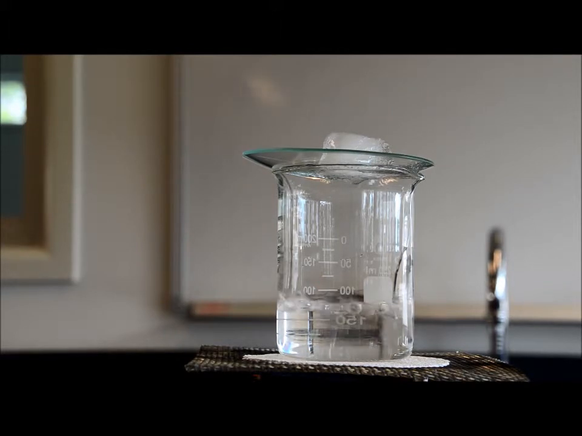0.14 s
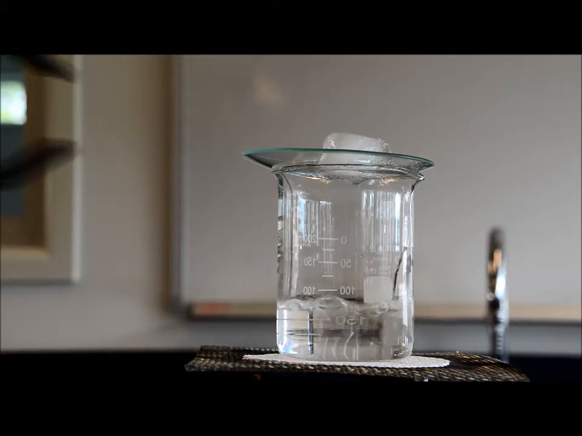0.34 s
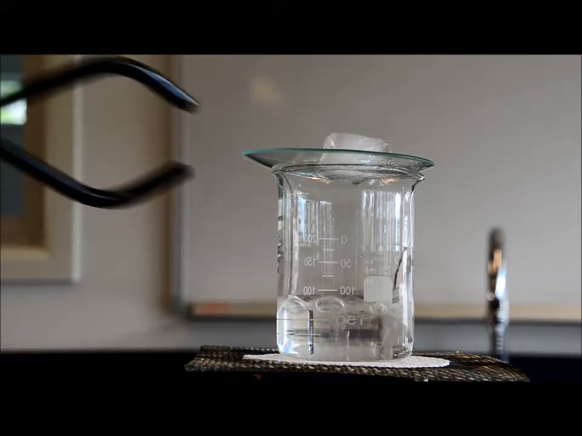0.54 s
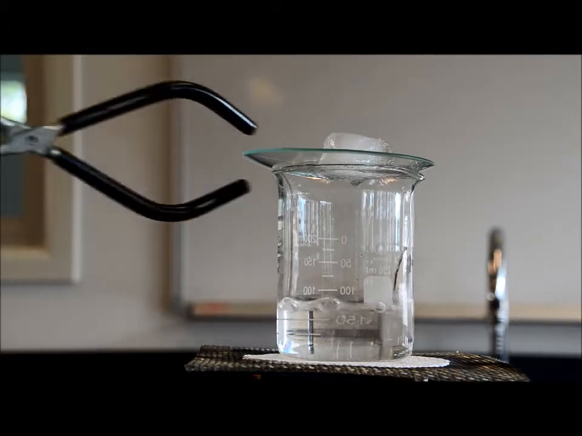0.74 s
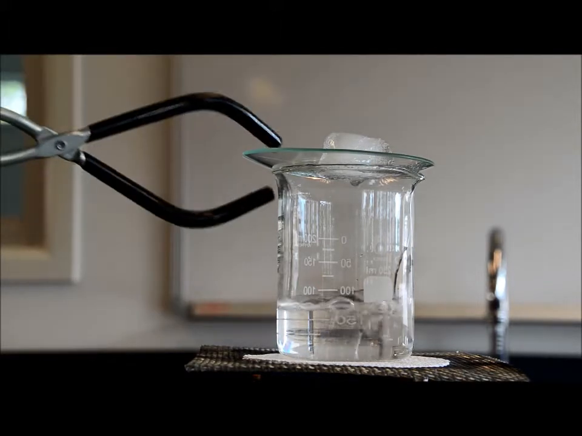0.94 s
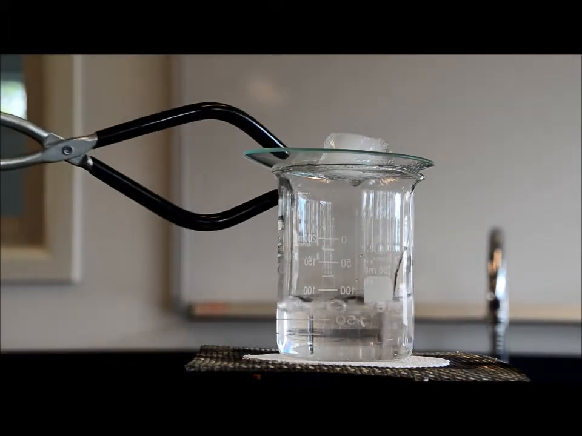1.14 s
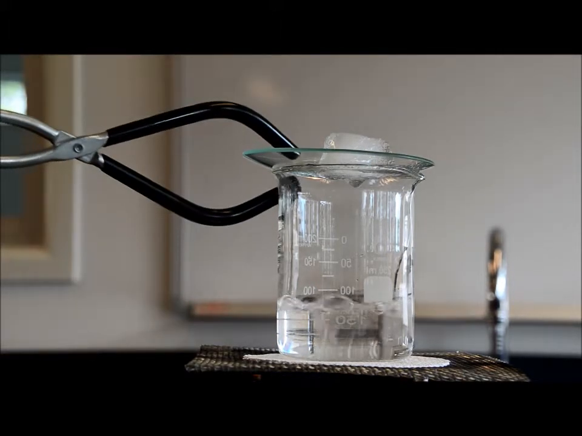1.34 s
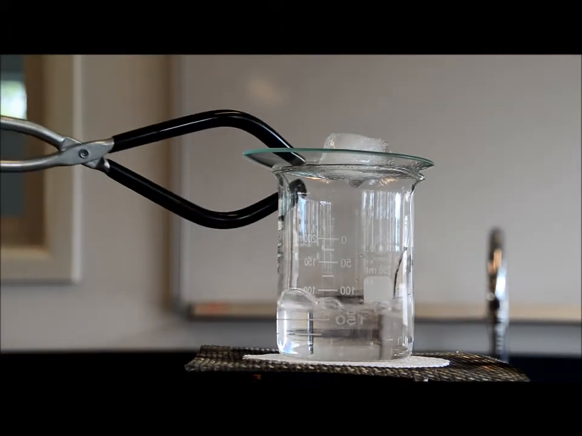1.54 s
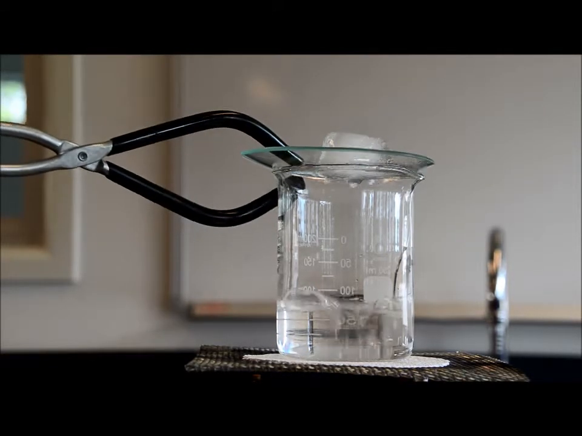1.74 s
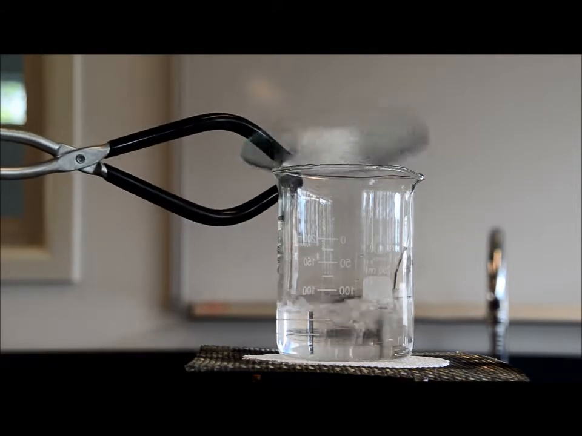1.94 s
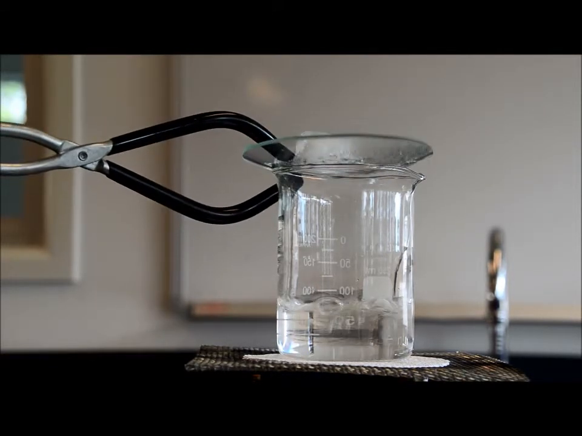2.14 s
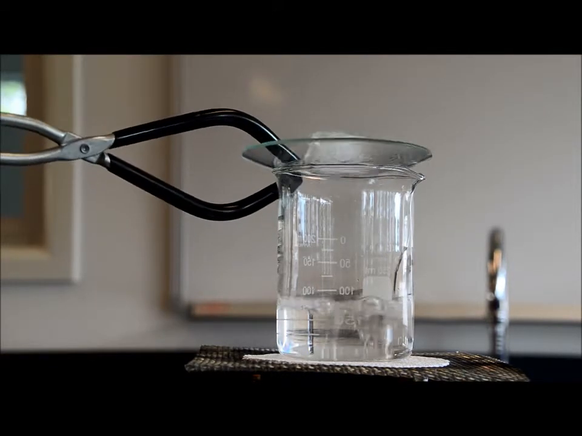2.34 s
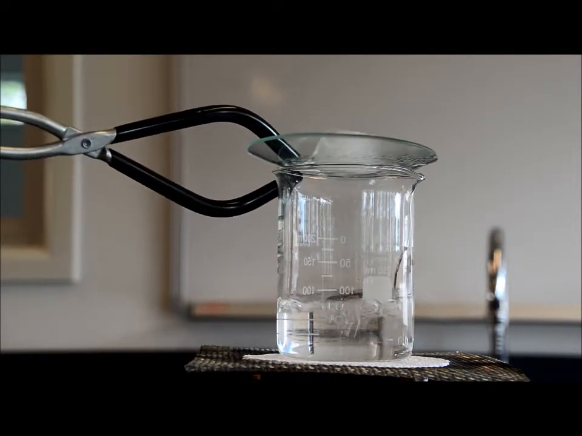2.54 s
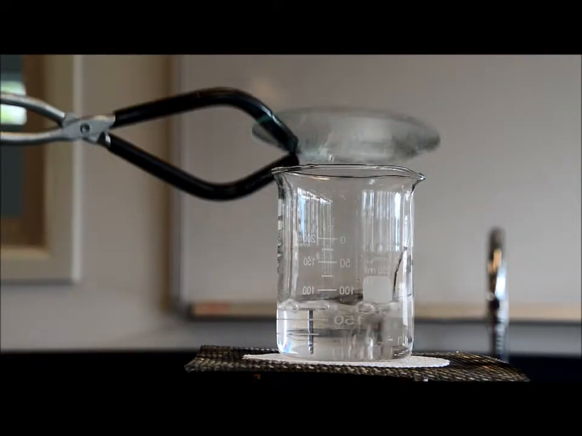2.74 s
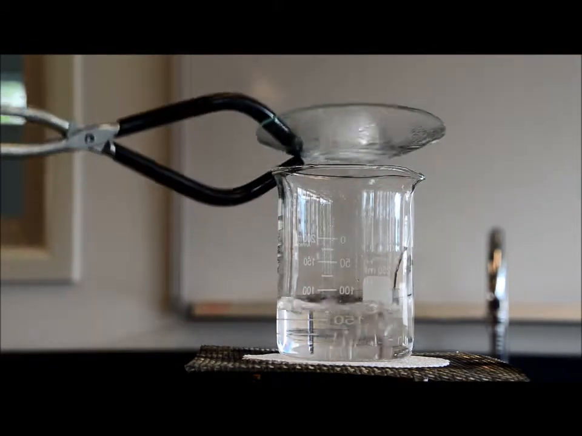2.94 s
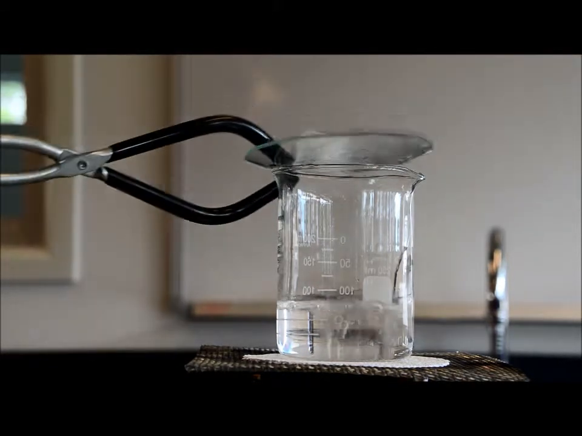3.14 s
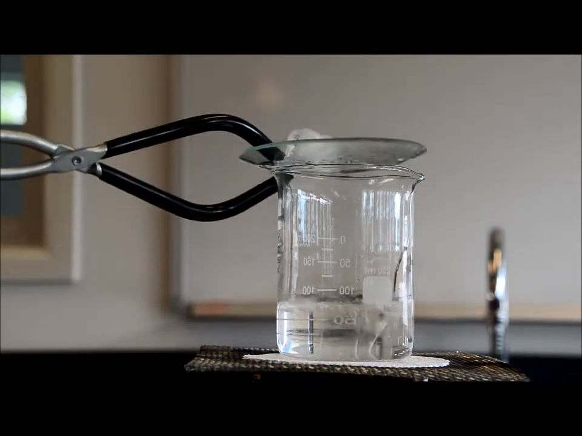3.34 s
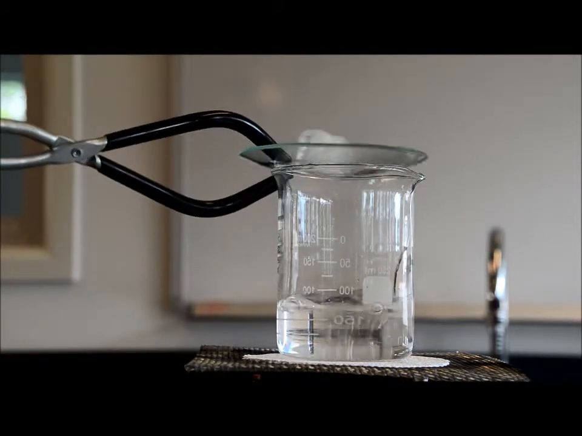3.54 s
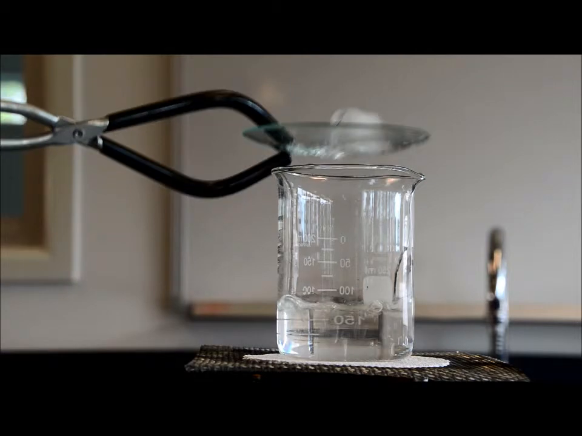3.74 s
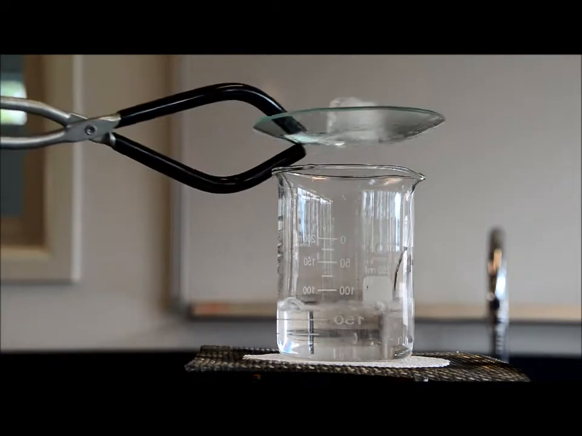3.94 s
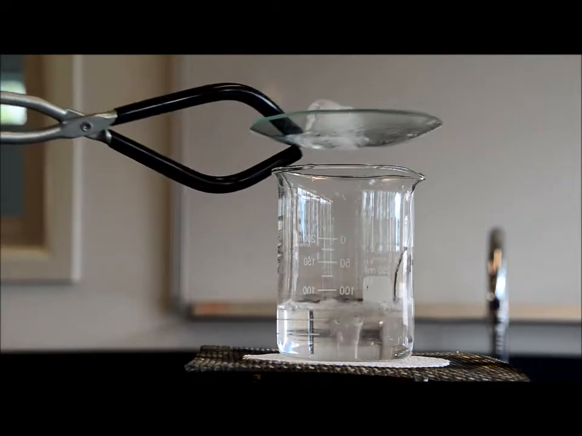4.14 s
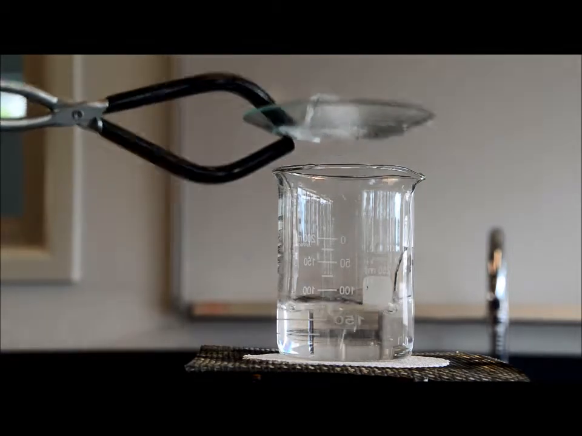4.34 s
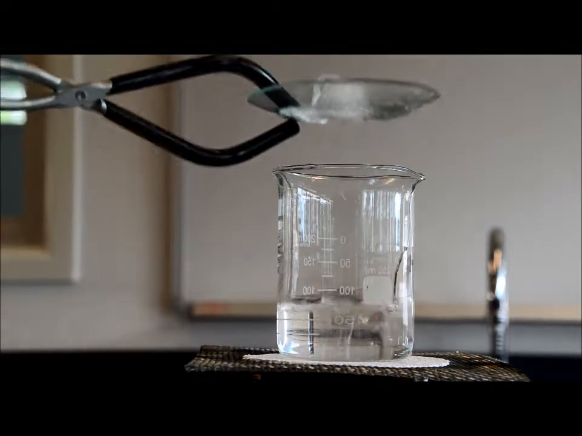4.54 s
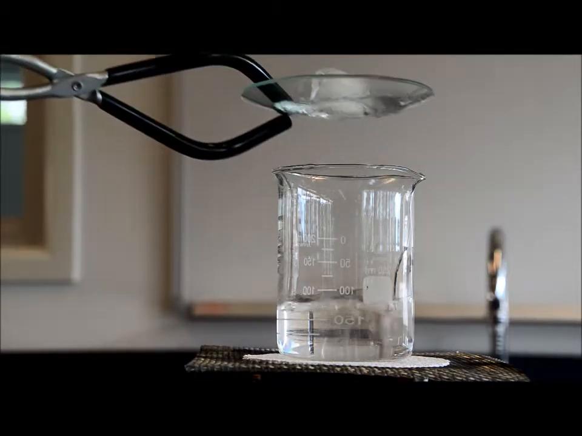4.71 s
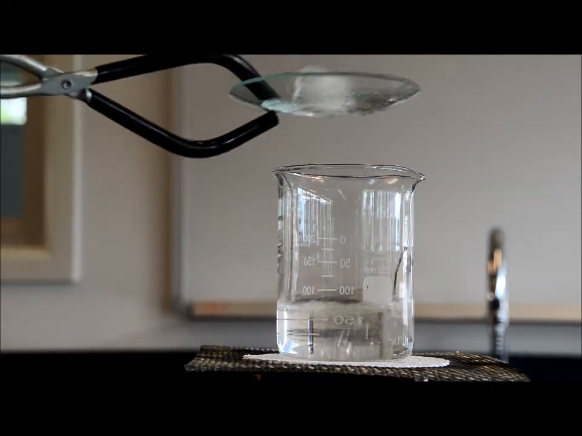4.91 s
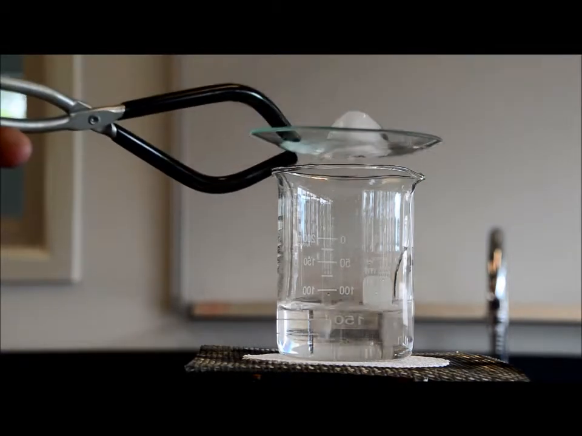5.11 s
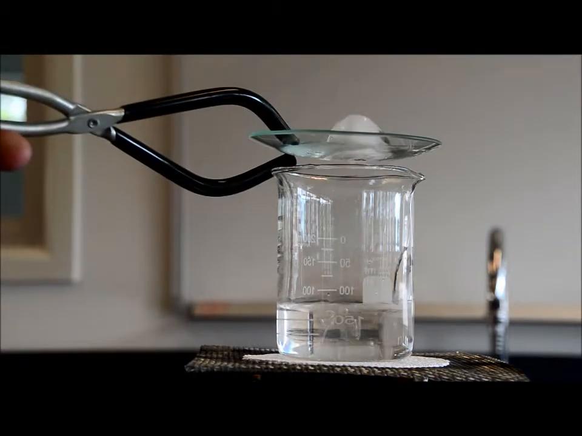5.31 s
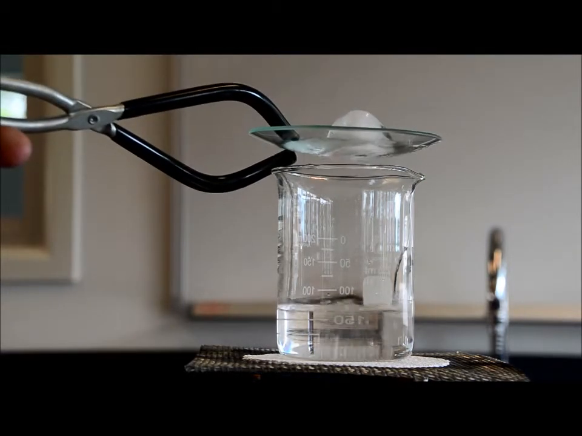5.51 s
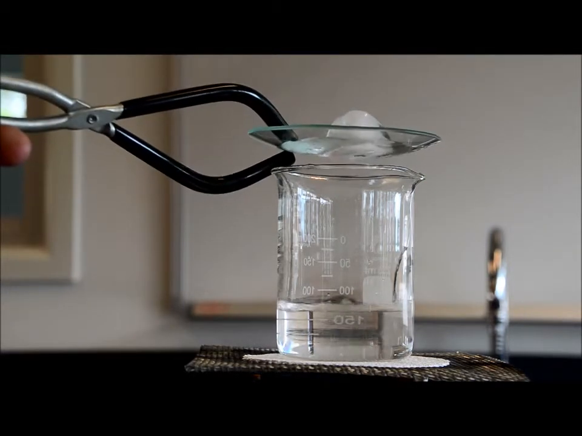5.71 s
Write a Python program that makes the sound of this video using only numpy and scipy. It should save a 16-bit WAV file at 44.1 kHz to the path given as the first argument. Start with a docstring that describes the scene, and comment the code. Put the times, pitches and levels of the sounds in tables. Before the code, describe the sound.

An airy, wavering whine around 1 kHz fades in with soft hiss, fine fizz and faint low hum. Coated tongs click on a glass beaker, then a bright, hard clink rings out at about three seconds. Lighter taps and tiny scrapes follow. All sound cuts out just after five seconds, then quiet jaw knocks and a dish clink close the scene. Close microphone, small room.

```python
"""Classroom: coated metal tongs lift a glass dish off a beaker of water; beaker and dish clink, jaws knock and scrape.
Contacts: clicks, clatter and damped modes, or friction bursts, with one wall echo and a diffuse tail.
Background: airy whine near 1 kHz (resonated noise), low hum (sine), rush and hiss (coloured noise),
faint fizz of tiny bubbles (random pings). It fades in; all sound breaks off shortly after 5 s,
then the background fades in again under the last clinks."""
import sys
import numpy as np
from scipy import signal
from scipy.fft import rfft, irfft
from scipy.io import wavfile
from scipy.ndimage import uniform_filter1d

SR = 44100
rng = np.random.default_rng(int(sys.argv[2]) if len(sys.argv) > 2 else 0)


def log_audio(samples):
    """Write samples as a 16-bit WAV file to the path given in sys.argv[1]."""
    # one column per channel
    frames = np.atleast_2d(samples).T
    # limit to full scale, then quantise
    limited = np.clip(frames, -1, 1)
    pcm = np.round(limited * 32767).astype(np.int16)
    wavfile.write(sys.argv[1], SR, pcm)


N = 254456
TIME_S = np.arange(N) / SR

# Colours: f/Hz, relative level/dB.
# Background fades, linear in amplitude: t/s, rise time/s
BACKGROUND_FADES = [(0, 1.66), (5.19, 2.2)]
# Silent gap: start t/s, end t/s
GAP_S = (5.116, 5.218)

# Whine resonances: f/Hz, width of each of two passes/Hz, level/dB
WHINE_RESONANCES = [(1100, 17, -6.5), (1087.5, 91.5, 1), (1035.4, 122, 0.5), (1284, 88, -17.5),
                    (1090, 240, -18), (1827, 66, -27), (632, 78, -22), (313, 45, -27.5)]
# Whine sags: t/s, attack/s, hold/s, release/s, change/dB
WHINE_LEVEL_SAGS = [(.76, 0.29, 0.34, 0.054, -6.5), (4.85, 0.18, .8, .1, -6.5)]
# Bubble pings: f/Hz, level/dB
BUBBLE_PINGS = [(3480, -0.5), (4250, -12), (5100, 1.5), (6550, -1), (7400, -1.5), (7950, 0.5), (8700, -9),
                (9350, 0), (9750, -4.5), (10800, -5), (11900, -9.5), (13300, -14.5)]
# Low rush colour: f/Hz, level/dB
RUSH_SPECTRUM = [(20, -11), (80, -3.5), (130, 0.5), (240, -1.5), (360, 0), (520, -0.5), (800, 3),
                 (1200, -12.5), (1700, -25.5)]
# Mid hiss colour: f/Hz, level/dB
HISS_SPECTRUM = [(800, -18.5), (1400, -3), (1620, -1.5), (1820, 3.5), (2000, 0.5), (2350, -0.5),
                 (2900, -3.5), (3470, -5), (3800, -10), (4500, -7.5), (5200, -8), (7000, -30)]
# Treble hiss colour: f/Hz, level/dB
TREBLE_SPECTRUM = [(3000, -25.5), (4500, -5), (6550, 3.5), (7200, -2), (7900, 3.5), (8600, 0), (9700, 2),
                   (10400, -4), (11400, -5), (11950, -3.5), (12400, -11), (14300, -12.5), (15000, -20),
                   (15600, -28)]
# Sizzle colour: f/Hz, level/dB
SIZZLE_SPECTRUM = [(1200, -25), (2100, -4.5), (2900, -10), (3450, -3.5), (3850, -8.5), (4600, 3.5),
                   (5100, -4), (6400, -11), (7200, -23.5), (13000, -30.5), (16000, -46)]
# Partial notches in the hiss: f/Hz, width/Hz
HISS_HOLLOWS = [(5700, 730), (6900, 81)]
# Steady tones above the hum: f/Hz, level re low rush/dB
STEADY_TONES = [(162, -19), (593, -13.5)]
# Hum changes: t/s, attack/s, hold/s, release/s, change/dB
HUM_LEVEL_CHANGES = [(1.38, 0.41, .08, .07, -13), (2.2, 0.62, 0.39, .25, 4), (5.1, .1, .6, .1, -8)]
# Air swells: t/s, attack/s, hold/s, release/s, changes of rush/dB, mid hiss/dB, treble/dB, sizzle/dB
AIR_SWELLS = [(.2, 0.45, .04, .4, 1, 8.5, 0.5, -1), (1.22, 0.098, 0.22, 0.14, 2, 4, 1, 5),
              (1.53, 0.2, 0.11, 0.18, 3, 7, 4, 9.5), (2.8, 0.27, 0.44, 0.16, .8, 2, 1, 15),
              (3.85, 0.25, .06, 0.41, 1.5, 2, 3, 5.5)]

# Tap tables: t/s, knock level before low-pass/dB, relative ring level/dB, contact low-pass f/Hz,
# ring length as share of the free ring. Mode tables: f/Hz, relative level/dB, free t60/s.
# Beaker taps: t/s, knock/dB, ring/dB, low-pass f/Hz, ring share
BEAKER_CONTACTS = [(1.4933, -28, -34, 4500, 0.49), (1.4972, -29.5, -31.5, 8000, 0.33),
                   (1.5010, -35, -44, 11800, .7), (1.8698, -29.5, -31.5, 3800, 0.59),
                   (1.8865, -40, -47, 4950, .5), (2.3532, -60, -49, 6000, 0.58),
                   (2.4529, -38, -37.5, 4220, 0.6), (2.9583, -41.5, -47, 12000, 0.59),
                   (3.0864, -15, -23.5, 15850, 1), (3.1520, -30.5, -47, 9000, 0.96),
                   (3.7146, -54, -53, 6000, 0.66), (3.8742, -40.5, -45, 12000, 0.2)]
# Beaker body modes: f/Hz, level/dB, t60/s
BEAKER_RING = [ (943, 3.5, .07), (2616, -14, .11), (2825, -14, .1), (3411, -2.5, .11), (3490, -12, .18),
               (6030, -23, .16), (6105, -22, .14), (6391, -14.5, .13), (450, -14.5, 0.047),
               (660, -17, 0.048), (760, -17.5, 0.045), (1020, 4, 0.054), (1230, -2, 0.026),
               (1440, -21, 0.057), (1690, -8, 0.025), (1920, -5, 0.034), (2142, -11, .07), (2620, -19, .06),
               (3043, -15, 0.06), (3270, 6, 0.015), (6314, -2.5, 0.024), (8800, -16, 0.093),
               (10900, -18, 0.089), (11010, -21, .06), (11700, -16, 0.062), (13160, -26.5, .05)]
# Beaker knock colour: f/Hz, level/dB
BEAKER_KNOCK_SPECTRUM = [(60, -15), (250, -25.5), (600, -9.5), (950, 0.5), (1500, -6), (2300, -9),
                         (3200, -5.5), (3900, -22), (5200, -18), (5700, -29), (6400, -3), (7400, -17.5),
                         (9200, -17), (12800, -22), (16000, -28.5)]
# Jaw knocks on the rim: t/s, knock/dB, ring/dB, low-pass f/Hz, ring share
JAW_CONTACTS = [(1.4965, -30, -25, 480, 0.8), (5.5205, -36.5, -44, 900, 0.71),
                (5.5238, -40, -41, 9000, 0.45), (5.5262, -39, -45.5, 8000, 0.91),
                (5.5352, -49, -52, 3500, 1), (5.5415, -52, -51, 4000, 0.93),
                (5.6902, -42.5, -50, 6000, 0.89), (5.6950, -48, -61, 5000, .8),
                (5.7004, -34, -51, 4480, 0.8), (5.7060, -55, -62, 7000, 0.72),
                (5.7112, -43, -35, 7000, 0.68), (5.7232, -53, -63, 14000, 1)]
# Jaw contact modes: f/Hz, level/dB, t60/s
JAW_RING = [(347, -16.5, 0.24), (438, -22, 0.032), (630, -23, 0.04), (786, -14.5, 0.3), (1860, 0, 0.037),
            (2020, -1, 0.063), (2180, 3.5, 0.014), (2632, 4, 0.04), (3590, -0.5, 0.038), (4000, 3.5, 0.015),
            (6630, -13, 0.048), (6660, -12.5, 0.077), (8270, -19, 0.12), (10340, -13, 0.055)]
# Jaw knock colour: f/Hz, level/dB
JAW_KNOCK_SPECTRUM = [(150, -38), (330, -13), (480, -13), (720, 3), (1200, -3.5), (1900, 4), (2600, -16),
                      (3000, -16), (3900, -12), (4700, -10), (5700, -24), (6500, 4), (7500, -25),
                      (10400, -22.5), (16000, -35)]
# Dry tong scrapes: t/s, initial level/dB, time to 1/e/s
TONG_SCRAPES = [(2.141, -52, 0.014), (2.152, -52, 0.011), (4.184, -47.5, .005), (4.495, -56.5, 0.013),
                (4.673, -54.5, 0.0097), (4.824, -58.5, 0.021), (4.963, -53.5, 0.0048), (4.969, -54, 0.0057),
                (4.987, -55, 0.0067)]
# Scrape colour: f/Hz, level/dB
SCRAPE_SPECTRUM = [(100, 8), (300, 8), (700, -1.5), (2200, -3), (4500, 6.5), (5700, -7), (7000, -1.5),
                   (9500, -2), (13000, -14), (16000, -34.5)]
# Dish clinks on the rim: t/s, knock/dB, ring/dB, low-pass f/Hz, ring share
DISH_CONTACTS = [(5.5545, -63, -65, 12000, 0.38), (5.5722, -22.5, -28.5, 11800, 0.54)]
# Dish body modes: f/Hz, level/dB, t60/s
DISH_RING = [ (3601, -14, .36), (3680, 5.5, .028), (3624, -21, .3), (2616, -12, .08), (6713, -22, .19),
             (2089, -12, .06), (1440, 0.5, 0.014), (3450, -18, 0.0091), (3870, -13, 0.016),
             (4134, -28, 0.1), (4694, -34, 0.055), (6340, -5.5, 0.04), (8000, -22, 0.045),
             (10500, -24, 0.054)]
# Dish knock colour: f/Hz, level/dB
DISH_KNOCK_SPECTRUM = [(100, -67), (340, -7), (450, -14), (1000, -12), (1550, -23), (2600, 1.5),
                       (2950, -10.5), (3700, 14.5), (4300, 0), (5100, -7.5), (5700, -14), (6400, -6),
                       (7700, -13), (9000, -32), (10400, -23), (16000, -29)]

# Base rms levels, before fades, swells, calm and hollows
WHINE_DB, RUSH_DB, HUM_DB = -42, -62, -68
HISS_DB, TREBLE_DB, SIZZLE_DB = -63, -67.5, -66.3
HUM_HZ = 46.8
# Treble and sizzle are softer at first and again from the gap on
CALM_END_S, CALM_RELEASE_S = 1.167, 0.16
CALM_TREBLE_DB, CALM_SIZZLE_DB = -3, -4
ROOM_T60_S = 0.29
CUTOFF_HZ = 15700


def from_db(db):
    """Decibels to amplitude gain."""
    return 10 ** (np.asarray(db) / 20)


def rms_one(x):
    """Scale to unit rms."""
    return x / np.sqrt(np.mean(x ** 2) + 1e-20)


def colour(points, size):
    """FFT-grid gain: dB interpolated over log f, rolled off beyond both ends."""
    hz, db = np.transpose(points)
    grid_hz = np.maximum(np.fft.rfftfreq(size, 1 / SR), 1)
    gain = from_db(np.interp(np.log(grid_hz), np.log(hz), db))
    treble_loss = 1 + (grid_hz / (2 * hz[-1])) ** 2
    bass_loss = 1 + (hz[0] / (2 * grid_hz)) ** 2
    return gain / treble_loss / bass_loss


def noise(points, size=N):
    """Coloured Gaussian noise, rms 1."""
    spectrum = rfft(rng.standard_normal(size))
    return rms_one(irfft(spectrum * colour(points, size), size))


def sine(hz):
    """Steady sine, rms 1."""
    return np.sqrt(2) * np.sin(2 * np.pi * hz * TIME_S)


def resonate(x, hz, width_hz):
    """One resonance, peak gain 1."""
    return signal.lfilter(*signal.iirpeak(hz, hz / width_hz, fs=SR), x)


def soften(x, hz):
    """Second-order low-pass: softer surfaces lose treble."""
    return signal.sosfilt(signal.butter(2, min(hz, .45 * SR), fs=SR, output="sos"), x)


def add(out, s, sound):
    """Mix a sound in at s seconds."""
    start = round(s * SR)
    out[start:start + len(sound)] += sound[:N - start]


def swell_db(rows):
    """Rise, hold, return; summed change in dB, one curve per level column."""
    total_db = 0
    for start, attack, hold, release, *levels_db in rows:
        corners_s = start + np.cumsum([0, attack, hold, release])
        total_db = total_db + np.outer(levels_db, np.interp(TIME_S, corners_s, [0, 1, 1, 0]))
    return total_db


def fade():
    """Background gain: each fade rises linearly from silence."""
    gain = np.zeros(N)
    for start, length in BACKGROUND_FADES:
        rise = np.clip((TIME_S - start) / length, 0, 1)
        gain = np.where(TIME_S >= start, rise, gain)
    return gain


def whine(steadiness=0.21):
    """Air noise in narrow resonances: fluttering pitch, loudness partly evened out."""
    tone = np.zeros(N)
    for hz, width_hz, db in WHINE_RESONANCES:
        band = resonate(rng.standard_normal(N), hz, width_hz)
        tone += from_db(db) * rms_one(resonate(band, hz, width_hz))
    power = uniform_filter1d(tone ** 2, SR // 10) + 1e-12
    level_db = WHINE_DB + swell_db(WHINE_LEVEL_SAGS)[0]
    return from_db(level_db) * rms_one(tone / power ** steadiness)


def fizz(per_s, spread_db, cycles):
    """Tiny uneven bubbles burst at random; each ping falls 60 dB in the given cycles; rms 1."""
    bursts = rng.random(N) < per_s / SR
    sizes = from_db(spread_db * np.minimum(rng.exponential(1, N), 3)) * bursts
    pitch_index = rng.integers(0, len(BUBBLE_PINGS), N)
    t = TIME_S[:SR // 20]
    out = np.zeros(N)
    for k, (hz, db) in enumerate(BUBBLE_PINGS):
        ping = from_db(db - 60 * t * hz / cycles) * np.sin(2 * np.pi * hz * t)
        out += signal.oaconvolve(sizes * (pitch_index == k), ping)[:N]
    return rms_one(out)


def air():
    """Coloured-noise rush and fizzing hiss with two hollows, plus sine hum and tones."""
    rush_db, mid_db, treble_db, sizzle_db = swell_db(AIR_SWELLS)
    calm = np.clip(1 - (TIME_S - CALM_END_S) / CALM_RELEASE_S, 0, 1) + (TIME_S > GAP_S[0])
    treble_db = TREBLE_DB + treble_db + CALM_TREBLE_DB * calm
    sizzle_db = SIZZLE_DB + sizzle_db + CALM_SIZZLE_DB * calm
    bubbles = from_db(-2) * fizz(per_s=380, spread_db=4.5, cycles=80)
    hiss = from_db(HISS_DB + mid_db) * noise(HISS_SPECTRUM)
    hiss += from_db(treble_db) * (noise(TREBLE_SPECTRUM) + bubbles)
    hiss += from_db(sizzle_db) * noise(SIZZLE_SPECTRUM)
    for hz, width_hz in HISS_HOLLOWS:
        hiss = hiss - .76 * resonate(hiss, hz, width_hz)
    tones = sum(from_db(db) * sine(hz) for hz, db in STEADY_TONES)
    rush = from_db(RUSH_DB + rush_db) * (noise(RUSH_SPECTRUM) + tones)
    hum = from_db(HUM_DB + swell_db(HUM_LEVEL_CHANGES)[0]) * sine(HUM_HZ)
    return hiss + rush + hum


def pulse(points, size=4096):
    """Minimum-phase click of a given colour, peak 1, via the folded cepstrum."""
    cepstrum = irfft(np.log(colour(points, size)))
    cepstrum[1:size // 2] *= 2
    cepstrum[size // 2 + 1:] = 0
    click = irfft(np.exp(rfft(cepstrum)))
    return click / np.abs(click).max()


def contact_sounds(taps, modes, knock_colour, clatter_db, clatter_t60_s):
    """Per tap: click, decaying noise for a clatter of dense modes, and damped body modes."""
    out, t = np.zeros(N), TIME_S[:SR // 2]
    click = pulse(knock_colour)
    for s, knock_db, ring_db, bright_hz, free in taps:
        knock = from_db(clatter_db - 60 * t / clatter_t60_s) * noise(knock_colour, size=len(t))
        knock[:len(click)] += click
        # a contact that stays pressed on damps the ring
        fall_db = 60 * t / max(free, .1)
        ring = np.zeros(len(t))
        for k, (hz, db, t60_s) in enumerate(modes):
            # alternate signs; level varies per tap
            mode_gain = from_db(db + rng.normal() - fall_db / t60_s)
            ring += (-1) ** k * mode_gain * np.sin(2 * np.pi * hz * t)
        add(out, s, soften(from_db(knock_db) * knock + from_db(ring_db) * ring / 2, bright_hz))
    # small objects radiate little bass; the offset avoids denormals
    return signal.sosfilt(signal.butter(2, 170, "high", fs=SR, output="sos"), out + 1e-18)


def beaker():
    """Taps excite the clear damped modes of the beaker."""
    return contact_sounds(BEAKER_CONTACTS, BEAKER_RING, BEAKER_KNOCK_SPECTRUM,
                          clatter_db=-12, clatter_t60_s=.055)


def jaws():
    """Tong jaws knock dully on the rim: short clatter and damped modes."""
    return contact_sounds(JAW_CONTACTS, JAW_RING, JAW_KNOCK_SPECTRUM,
                          clatter_db=-7, clatter_t60_s=.022)


def scrapes():
    """Jaws slip on the glass: friction noise with a half-Gaussian decay."""
    out, t = np.zeros(N), TIME_S[:SR // 10]
    for s, db, length_s in TONG_SCRAPES:
        envelope = from_db(db) * np.exp(-(t / length_s) ** 2)
        add(out, s, envelope * noise(SCRAPE_SPECTRUM, size=len(t)))
    return out


def dish():
    """Clinks on the rim excite the damped modes of the dish."""
    return contact_sounds(DISH_CONTACTS, DISH_RING, DISH_KNOCK_SPECTRUM,
                          clatter_db=-9, clatter_t60_s=.022)


def room(x, wet_db, wall_hz, echo_s, echo_db):
    """One echo from the wall behind the bench plus a dull diffuse tail."""
    t = TIME_S[:SR // 2]
    envelope = from_db(-60 * t / ROOM_T60_S) * (1 - np.exp(-t / .003))
    tail = soften(rng.standard_normal(len(t)), wall_hz) * envelope
    response = from_db(wet_db) * tail / np.linalg.norm(tail)
    add(response, echo_s, from_db(echo_db) * soften(signal.unit_impulse(64), wall_hz))
    return x + signal.fftconvolve(x, response)[:N]


def scene():
    """Glass and tongs in the room, over the fading background."""
    background = fade() * (whine() + air())
    contacts = beaker() + jaws() + scrapes() + dish()
    contacts = room(contacts, wet_db=-16.0, wall_hz=8000, echo_s=.0098, echo_db=-12.0)
    return (contacts + background)[None]


def record(dry):
    """Mute the gap with 64-sample edges, then low-pass steeply."""
    playing = 1.0 * ((TIME_S < GAP_S[0]) | (TIME_S > GAP_S[1]))
    playing = uniform_filter1d(playing, size=64)
    return signal.sosfilt(signal.ellip(10, .2, 70, CUTOFF_HZ, fs=SR, output="sos"), dry * playing)


dry = scene()
out = record(dry)
log_audio(out)
```